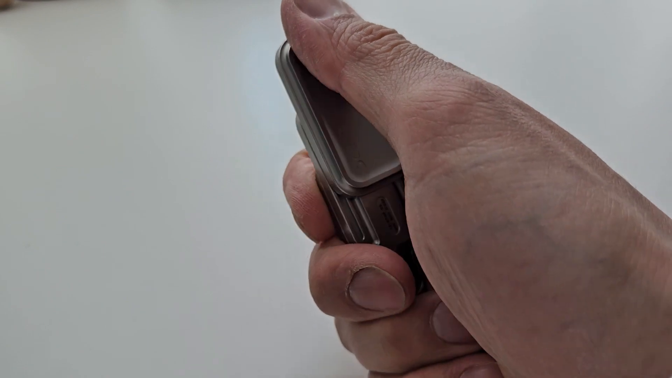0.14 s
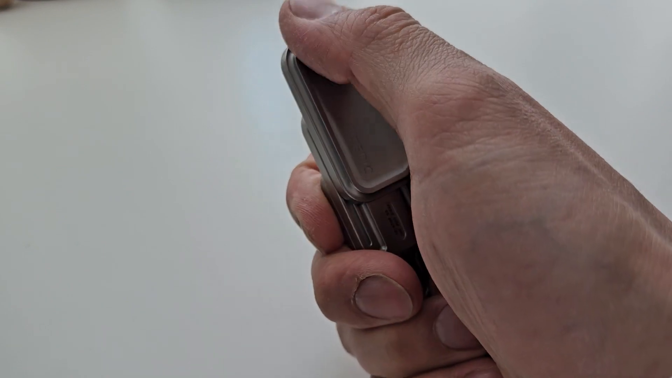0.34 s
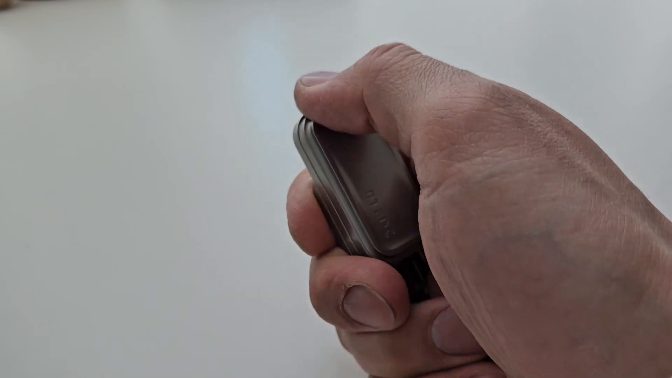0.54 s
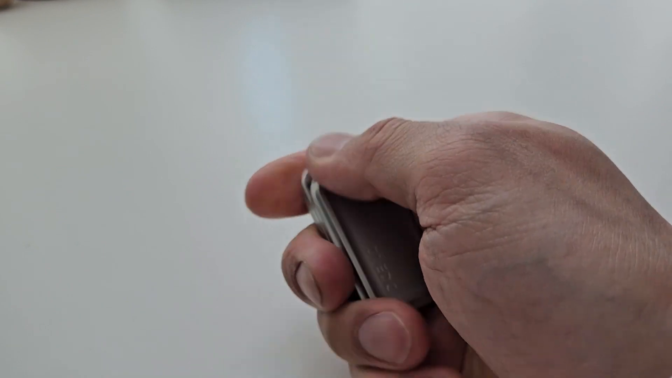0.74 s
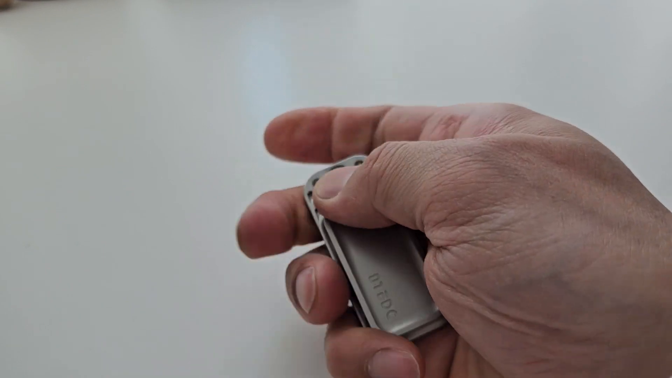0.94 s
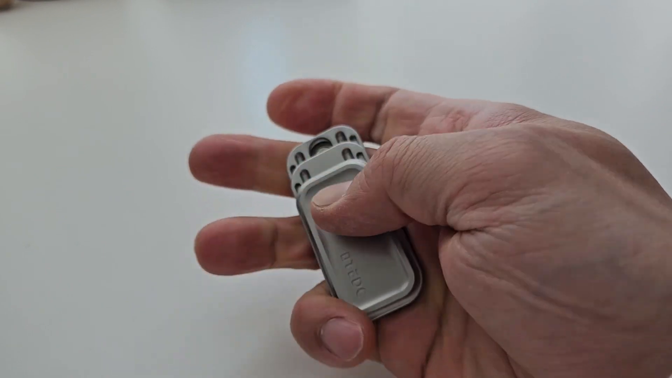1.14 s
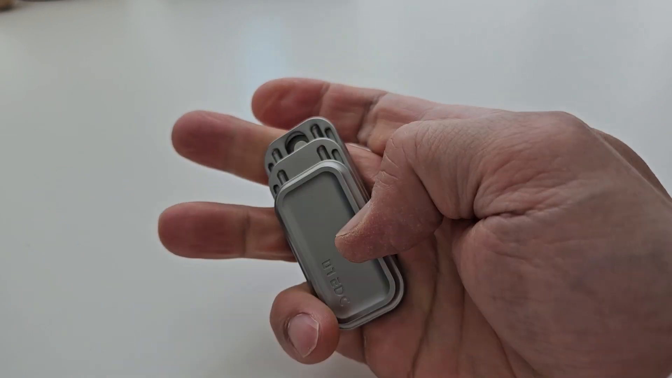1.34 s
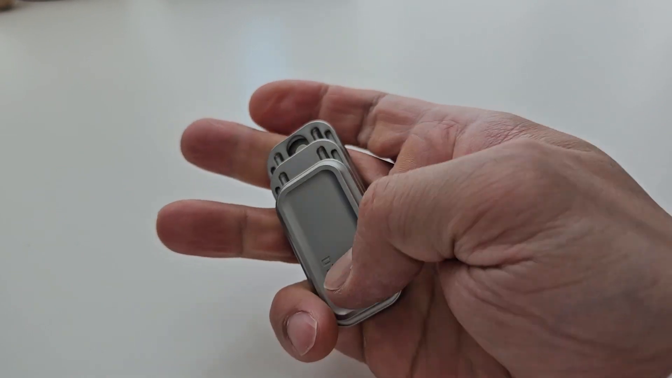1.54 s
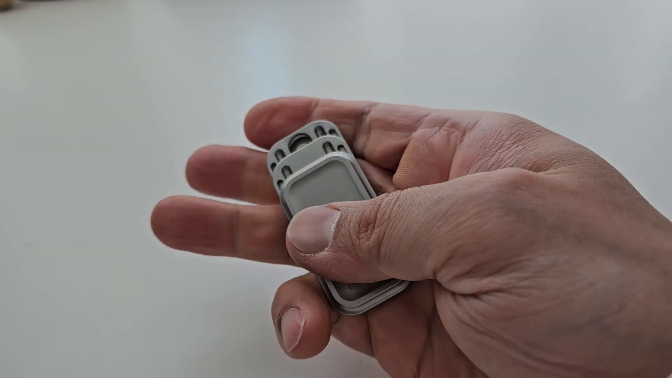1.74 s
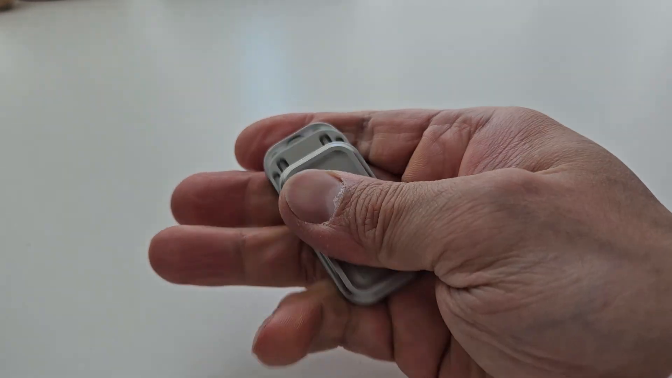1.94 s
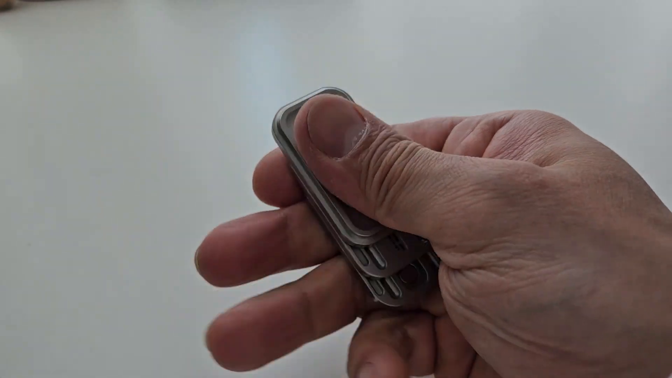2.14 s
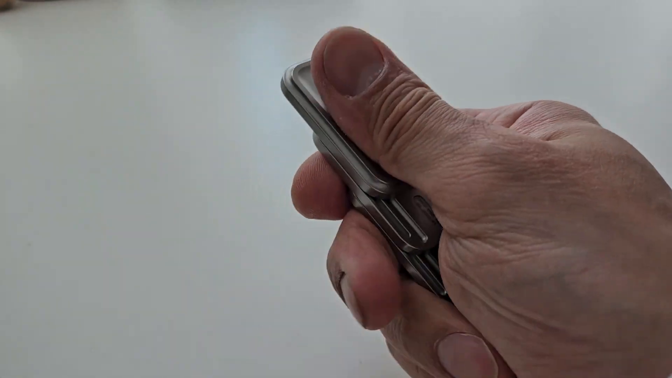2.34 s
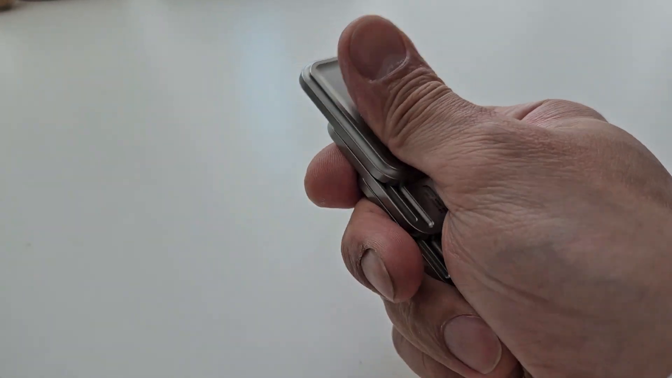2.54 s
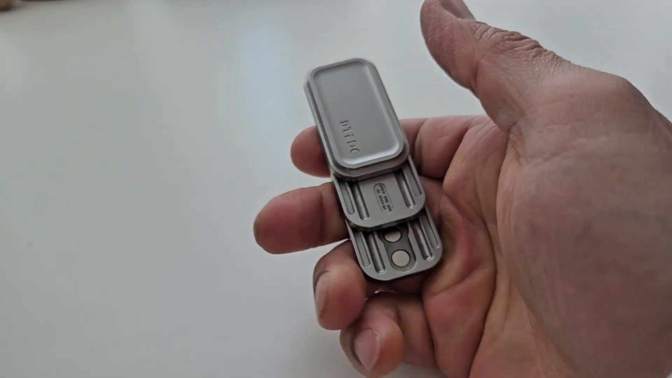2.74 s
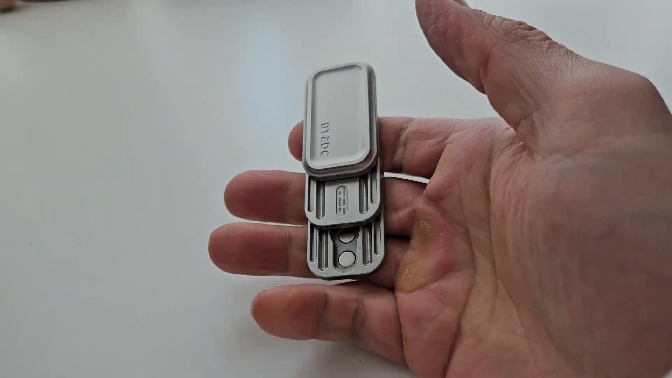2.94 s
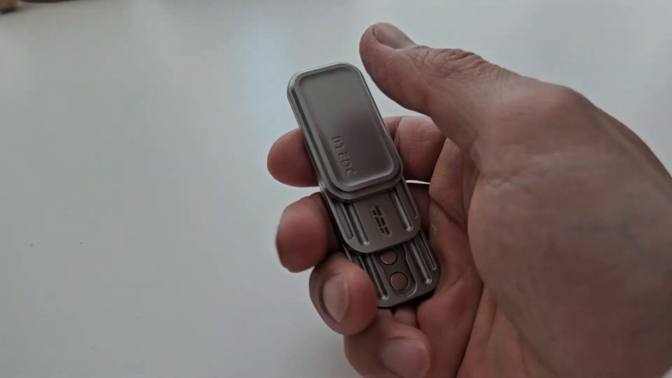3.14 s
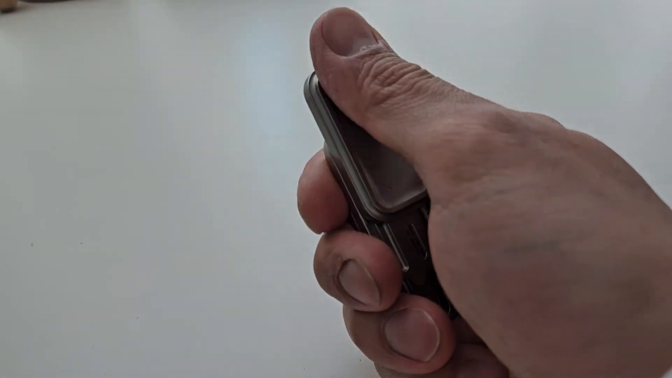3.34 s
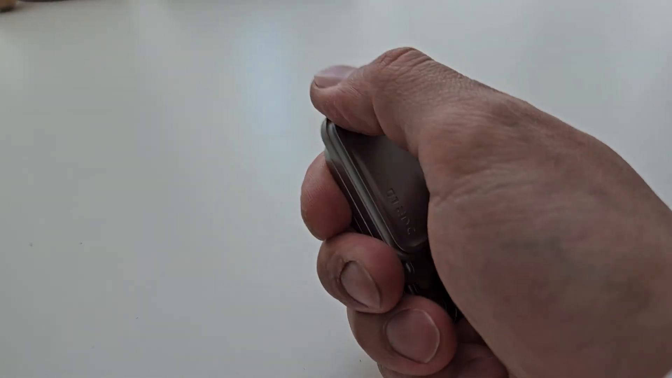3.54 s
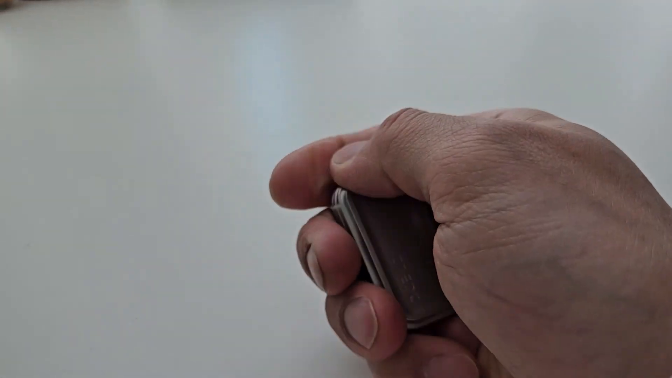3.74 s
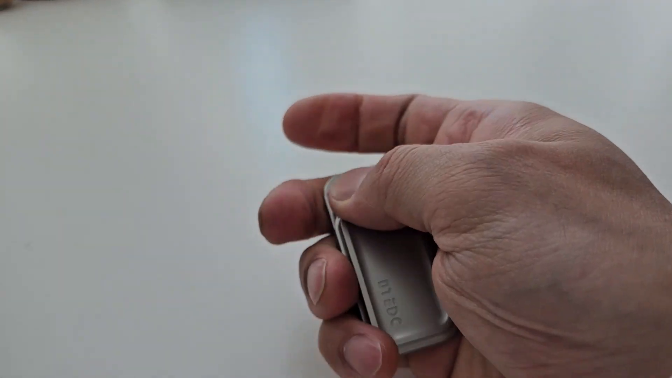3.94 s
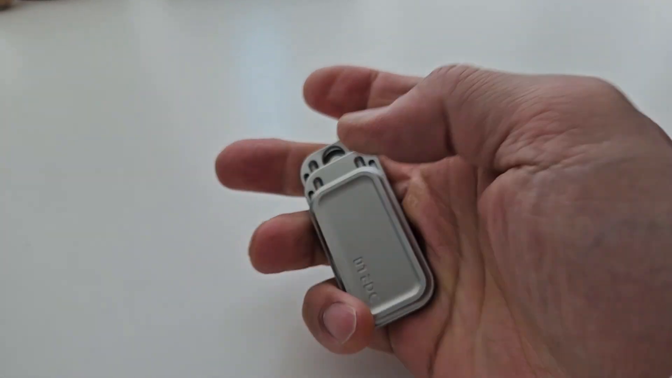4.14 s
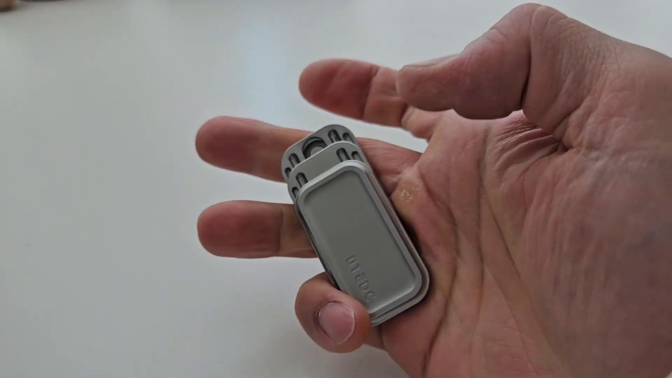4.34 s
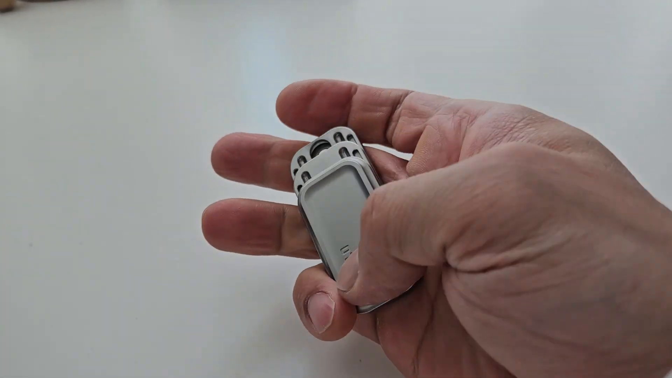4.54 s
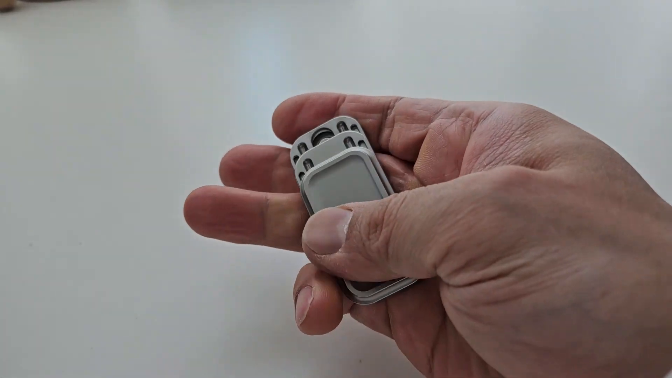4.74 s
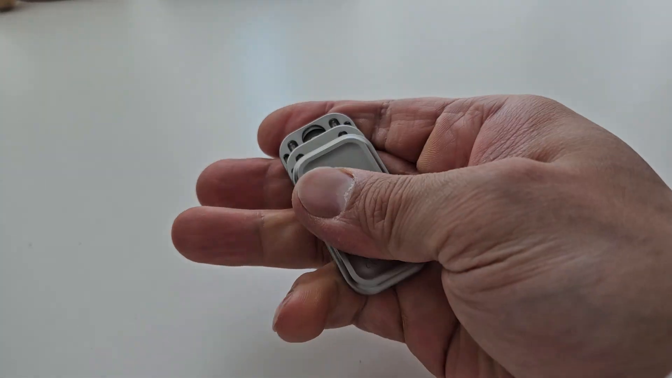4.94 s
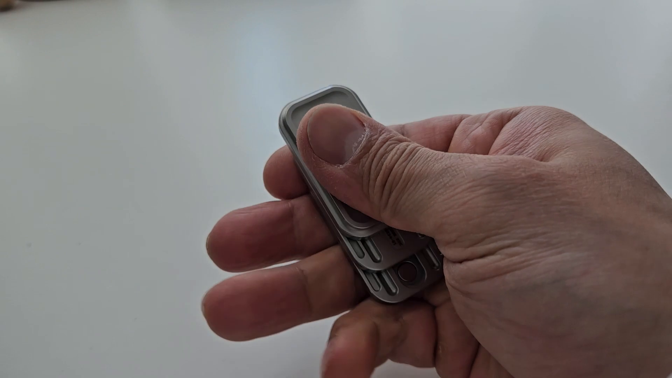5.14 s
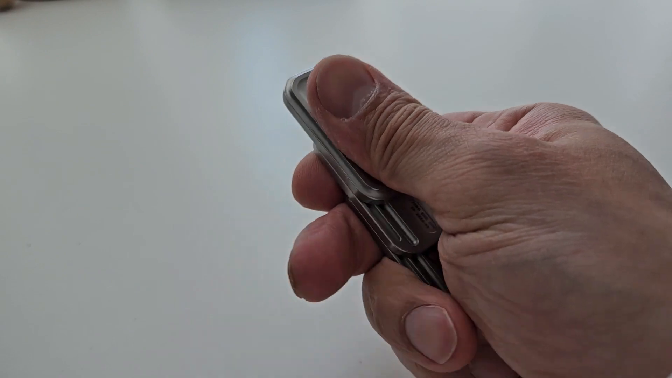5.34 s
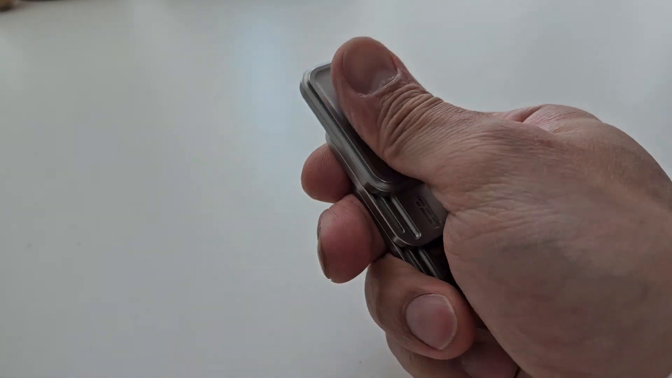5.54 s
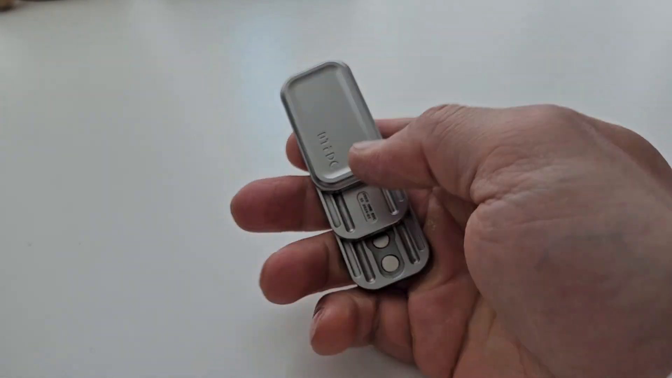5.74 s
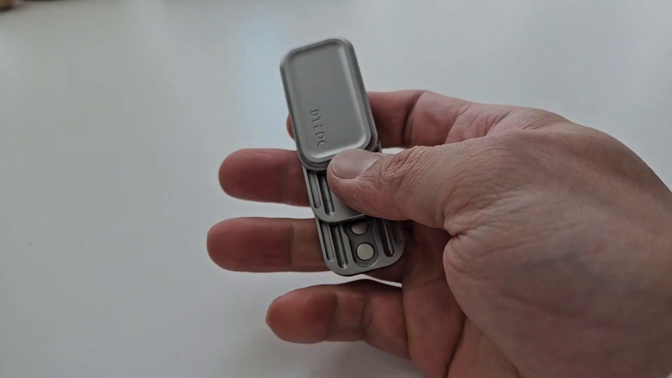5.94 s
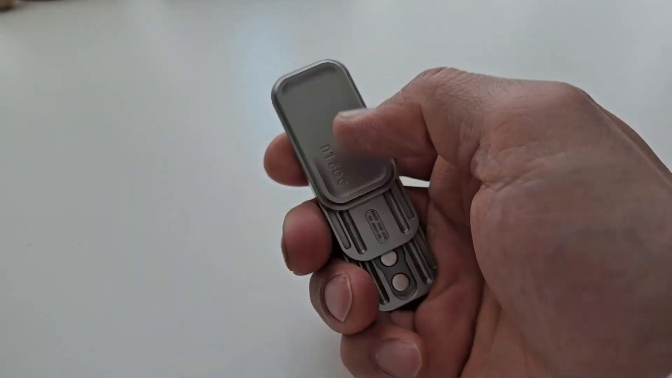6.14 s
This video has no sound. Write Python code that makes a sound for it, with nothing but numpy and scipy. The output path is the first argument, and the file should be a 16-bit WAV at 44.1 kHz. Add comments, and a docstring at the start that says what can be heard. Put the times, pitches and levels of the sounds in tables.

```python
"""A quiet room: close above a table, a metal magnetic slider is worked in one hand: shut, open, shut, open.
In each stroke the magnets catch a plate, it bumps over detents and slams into its end stop.
Each impact is a noise force that cracks and excites damped plate modes, which the fingers muffle.
The hand takes up each jolt with a soft thud; hard stops puff air at the left microphone port; low noise swells.
The room answers with decaying noise, over a faint rumble and hiss."""
import sys
import numpy as np
from scipy import signal
from scipy.fft import rfft, irfft
from scipy.io import wavfile
from scipy.ndimage import uniform_filter1d, minimum_filter1d

SR = 44100
rng = np.random.default_rng(int(sys.argv[2]) if len(sys.argv) > 2 else 0)


def generate_wav(sig):
    """Save sig (samples, or channels by samples) to the path in sys.argv[1] as 16-bit PCM at SR."""
    pcm = np.round(np.clip(np.atleast_2d(sig).T, -1, 1) * 32767).astype(np.int16)
    wavfile.write(sys.argv[1], SR, pcm)


N = 276948  # samples in the scene
EVENT_S = np.arange(-2646, 3969) / SR  # time axis of one event, its impact at zero

# Impacts of the plates: [t/s, kind, level/dB, brightness/(dB per octave), chatter decay/ms,
# f/Hz of the ping that the grip leaves free, ping level/dB re the impact]
SNAPS = [(0.4152, "catch", -20.5, 0.5, 3.7, 8850, -11.5), (0.4329, "catch", -21.5, 0, 2.3, 4740, -6),
         (0.504, "catch", -18.5, 1.5, 2.4, 3160, -5), (0.5201, "catch", -26.5, -2, 1.4, 6000, -7),
         (0.5723, "drag", -17, 0, 2.7, 9130, -11.5), (.6285, "drag", -27.5, -2, 2.9, 3040, -3),
         (0.7399, "shut", -13.5, 0, 8.7, 8640, -7.5), (0.8124, "shut", -16.5, 1, 2.2, 8640, -6),
         (1.0492, "step", -76.5, 5, 2.5, 4270, -21), (1.9384, "catch", -18, 4, 3, 8160, -1),
         (1.9477, "catch", -26.5, 5.5, 4.1, 9600, -10.5), (2.0076, "open", -17.5, -0.5, 1.4, 6570, -8),
         (2.0671, "step", -34, -1, 2, 4270, 1), (2.1239, "step", -30.5, 4, 5.3, 4270, 0.5),
         (2.1982, "skid", -16.5, 0.5, 5.3, 8640, -13.5), (2.2994, "open", -18.5, 2, 5.6, 5540, -13.5),
         (2.486, "open", -45, -2, 3.7, 4900, -10), (3.529, "catch", -16, 1, 1.2, 8430, -3.5),
         (3.5992, "catch", -19, -0.5, 2.6, 9130, -5.5), (3.652, "drag", -24, -1, 1.5, 4900, -4),
         (3.705, "drag", -27.5, -1, 3, 2850, -2.5), (3.8318, "shut", -14.5, 0, 4.4, 8430, -8),
         (3.8793, "shut", -15, 1.5, 2.7, 9130, -7), (4.0506, "step", -60, -5.5, 2.8, 4270, -5),
         (4.9418, "catch", -19.5, 3, 2.9, 8850, -10), (4.961, "step", -34.5, 2, 1.5, 4580, -13),
         (5.0491, "step", -34.5, 0.5, 8.3, 4580, -8), (5.1088, "step", -39, 1.5, 5.9, 4270, -6.5),
         (5.1831, "skid", -16, .5, 12.3, 8430, -11.5), (5.274, "open", -16, 2, 5.1, 4740, -11),
         (5.425, "open", -47.5, -1, 3.2, 5540, -4)]
# Kinds of impact: the magnets "catch"; closing, a plate "drag"s over dull detents and slams "shut";
# it "step"s over light detents while opening, or ticks faintly after a closing stroke;
# opening, it "skid"s along its rails and hits the "open" stop.
# kind: [scrape swell/ms, scrape level/dB re contact, contact softness/ms, muffled band level/dB,
# left minus right level/dB, room send level/dB, thud level/dB re the impact]
KINDS = {"catch": (7, -27, 1, -10, -1.5, 2, -27.5), "drag": (5.5, -15.5, 1.94, -10.5, -.5, 0.5, -30.5),
         "shut": (9.5, -20.5, 1.12, -2.5, 1.63, 4, -30), "step": (5, -26, 2.1, -6.5, -1, 4, -6),
         "skid": (6.5, -19, 1.1, -14.5, -3, 5.5, -37), "open": (5, -23.5, 1, -4.5, -4, 2.5, -26)}
# Tone of each kind before its brightness tilt; kind: [knock, clack, clink, ring, tick relative level/dB]
TONES = {"catch": (-28, -8, -4.5, -3.5, -14), "drag": (-31.5, -1, -7.5, -12, -26.5),
         "shut": (-22, -8.5, -8, -1.5, -12.5), "step": (-29, -10.5, -3, -7, -13.5),
         "skid": (-33.5, -18.5, -1.5, -8.5, -5.5), "open": (-25, -11.5, -7, -5, -6)}
# Registers of the metal, knock, clack, clink, ring and tick: [lower f/Hz, upper f/Hz]
REGISTERS = [(250, 1750), (2000, 3700), (3700, 7000), (7000, 10000), (10000, 16500)]
# Modes of the plates before the grip alters them: [f/Hz, undamped t60/s, relative level/dB]
PLATE_MODES = [(2250, .025, -19), (2850, .025, -5), (3040, .03, 1), (3160, .03, 3), (3390, .025, 2),
               (3900, .025, -10), (4270, .04, -5), (4580, .03, -1), (4740, .025, -1), (4900, .03, 0),
               (5100, .02, -2), (5540, .02, -2), (6000, .02, -6), (6570, .025, -2), (7400, .03, -6),
               (7740, .03, -4), (8160, .035, 2), (8430, .03, 2), (8640, .04, 2), (8850, .03, 2),
               (9130, .03, 0), (9600, .012, -12), (10180, .02, -7), (15700, .06, -7.5)]
# Colour of the bare metal contact: [f/Hz, relative level/dB]
CONTACT_COLOUR = [(200, -16), (600, -15), (1250, -10), (1700, -12), (2050, -13), (2450, -10), (3100, 2),
                  (4000, -2.5), (5100, 2.5), (6500, -1), (8600, 2), (9800, -2), (12500, -6), (16000, -9)]
# Band of the plates that the fingers damp most; kind: centre f/Hz
MUFFLED_HZ = {"catch": 7530, "drag": 7200, "shut": 6900, "step": 7200, "skid": 3700, "open": 3800}
# Rings that end stops throw sideways into the room; kind: list of
# [f/Hz, half-width relative to f, level/dB re the impact before the room gain]
BLOOMS = {"shut": [(4200, .015, -13.5)], "skid": [(4900, .06, -6.5)], "open": [(5400, 0.068, -5),
          (2228, 0.15, -14)]}
# Hearing of the slider at the two ports: [f/Hz, left minus right level/dB, left lead/rad]
PORTS = [(475, 4.5, 2.5), (1241, 4, -0.05), (2040, 0, 1.96), (3350, 8, 2.5), (4000, 2, 1.5),
         (5200, -1.5, 1.5), (6800, 3, -2.5), (7400, 5, 2.1), (7800, -1.5, -1), (9980, 1.5, 2.5),
         (10650, 7.5, 9.5), (16100, 9, 7)]
# Reverberation of the room: [f/Hz, t60/s, relative level/dB]
ROOM = [(300, .3, -10), (1177, 0.18, -2), (2230, 0.28, 0), (2740, 0.24, -7.5), (4300, 0.3, 0),
        (7000, 0.29, -1), (8730, 0.26, 0), (11380, 0.16, 5.5), (15500, 0.22, -3.5)]
# Air squeezed out between the plates: [t/s, f/Hz, half-length/ms, level/dB at the left port]
PUFFS = [(.739, 231, 3.9, -23), (.746, 580, 2.3, -28.5), (.816, 72.3, 4.9, -18), (.8135, 330, 1.5, -22),
         (2.01, 120, 3.9, -32), (2.3004, 270, 2.9, -36), (3.8291, 241, 5.3, -23.5), (3.837, 418, 5.06, -30),
         (5.184, 213.3, 9.6, -45)]
# Low noise swells, rubbing during the strokes and faint swells of the background rumble:
# [t/s, half-length/ms, f/Hz, level/dB]
LOW_SWELLS = [(.03, 50, 153, -64.5), (0.601, 120, 90, -55), (2.11, 83, 82, -50.5),
              (2.73, 19.6, 53.5, -58.5), (3.72, 140, 71.8, -54.5), (5.11, 97, 79.05, -54)]
# Spectrum of the background: [f/Hz, relative spectral level/dB per Hz]
FLOOR = [(12, -36.5), (20, -7.5), (60, 3.5), (74, -6.5), (86, -9.5), (172, -2.5), (193, -12.5), (234, -2.5),
         (310, -17.5), (472, -18), (513, -27.5), (1090, -34), (1760, -40.5), (5000, -46.5), (10500, -52.5),
         (13500, -50), (16000, -50.5)]

MUFFLED_SHARE = .2  # half-width of the muffled band, relative to its centre
FIRM_DB, TICK_DB_PER_DB = -16.5, 0.06  # impacts softer than a firm one lose top treble
BLOOM_T60_S = .055
THUD_LAG_S = .007  # the flesh gives way just after the blow
ROOM_DB, FLOOR_DB = -14.5, -67
TOP_HZ = 15950


def slider():
    """Superposition: all impacts sum into the direct sound and the sound radiated into the room."""
    direct, send = np.zeros((2, 2, N))
    for s, kind, level_db, bright_db, chatter_ms, ping_hz, ping_db in SNAPS:
        scrape_ms, scrape_db, contact_ms, muffle_db, pan_db, send_db, _ = KINDS[kind]
        contact = contacts(scrape_ms, scrape_db, contact_ms, chatter_ms)
        levels = registers(kind, level_db, bright_db)
        sound = snap(contact, MUFFLED_HZ[kind], muffle_db, ping_hz, level_db + ping_db, levels)
        pan = undb(np.array([[pan_db], [-pan_db]]) / 2)
        add(direct, s, sound * pan)
        add(send, s, sound * undb(send_db))
        for hz, width, db in BLOOMS.get(kind, []):
            add(send, s, bloom(hz, width, level_db + db))
    return direct, send


def contacts(scrape_ms, scrape_db, contact_ms, chatter_ms,
             gap_ms=2.5, scatter=0.27, uneven=0.58, hold_ms=0.94, rise=0.6, count=8):
    """Repeated impact: a scrape swells, the blow falls, and uneven rebounds weaken on average."""
    ms = EVENT_S * 1000
    gaps = gap_ms * np.exp(scatter * rng.standard_normal(count))
    times = np.cumsum(gaps) - gaps[0]
    sizes = np.exp(-times / chatter_ms + uneven * rng.standard_normal(count))
    since = ms - times[:, None]
    # a soft contact builds up slowly; each decays with the time constant hold_ms
    constants_ms = np.where(since < 0, rise * contact_ms, hold_ms)
    blows = sizes @ np.exp(-np.abs(since) / constants_ms)
    scrape = (ms < 0) * np.exp(-np.abs(ms) / scrape_ms) * (1 - ms / ms[0])
    return blows + undb(scrape_db) * scrape


def snap(contact, muffle_hz, muffle_db, ping_hz, ping_db, levels,
         ring_db=1, apart=0.62, grip_db=5.0, damping=.75):
    """Modal excitation: a rough contact force cracks and rings plate modes that the grip selects."""
    count = len(EVENT_S)
    # partly shared by the two channels
    grit = rng.standard_normal(count) + apart * rng.standard_normal((2, count))
    force = grit * contact
    t = EVENT_S[EVENT_S >= 0]
    hz, t60, db = np.transpose(PLATE_MODES)[:, :, None]
    detune, grip = rng.standard_normal((2, len(hz), 1))
    rings = np.sin(2 * np.pi * hz * (1 + .003 * detune) * t) * fade(t, t60 * damping)
    rung = signal.fftconvolve(force[None], rings[:, None], axes=-1)[..., :count]
    gains = undb(db + grip_db * grip)
    plates = sum(gain * unit(mode) for gain, mode in zip(gains, rung))
    crack = unit(colour(force, CONTACT_COLOUR))
    sound = crack + undb(ring_db) * unit(plates)
    low_hz, high_hz = muffle_hz * (1 - MUFFLED_SHARE), muffle_hz * (1 + MUFFLED_SHARE)
    sound = colour(sound, [(low_hz, 0), (muffle_hz, muffle_db), (high_hz, 0)])
    # the mode nearest the ping's pitch escapes the fingers and stands out
    free = np.argmin(np.abs(hz - ping_hz))
    ping = band(rung[free], hz[free, 0] * .85, hz[free, 0] * 1.15)
    voiced = sum(burst(band(sound, lo, hi), level) for level, (lo, hi) in zip(levels, REGISTERS))
    return burst(ping, ping_db) + voiced


def registers(kind, level_db, bright_db):
    """Spectral balance: energy is shared among registers, tilted by brightness, duller when soft."""
    octaves = np.log2(np.mean(REGISTERS, axis=1))
    tone = np.array(TONES[kind]) + bright_db * octaves
    tone[-1] += TICK_DB_PER_DB * min(level_db - FIRM_DB, 0)
    return level_db + tone - 20 * np.log10(np.linalg.norm(undb(tone)))


def bloom(hz, width, level_db):
    """Directional radiation: a decaying narrow noise band is the ring an end stop throws to the room."""
    push = fade(EVENT_S, BLOOM_T60_S) * rng.standard_normal((2, len(EVENT_S)))
    return burst(band(push, hz * (1 - width), hz * (1 + width)), level_db)


def ports(x, size=2500):
    """Diffraction: so close, the phone's body shades and delays each port differently."""
    hz, *curves = np.transpose(PORTS)
    # both curves are smoothed over size spectral bins
    db, lead = (uniform_filter1d(on_axis(hz, curve, N), size) for curve in curves)
    half = undb(db / 2) * np.exp(1j * lead / 2)
    pair = np.array([half, 1 / half])
    mean_gain = np.sqrt(np.mean(np.abs(pair) ** 2, axis=0))
    return irfft(rfft(x) * pair / mean_gain, N)


def room(x, first_s=0.0074, early_db=4, early_t60=0.12, lumpy=0.19):
    """Reverberation: lumpy early reflections from table and walls melt into a tail, its t60 set per band."""
    t = np.arange(int(.7 * SR)) / SR
    hz, t60, db = np.transpose(ROOM)
    early = fade(t - first_s, early_t60)
    noise = rng.standard_normal((2, len(t)))
    noise = noise * np.exp(lumpy * early * rng.standard_normal((2, len(t))))
    spectrum = rfft(noise)
    tail = 0
    for share, life, level in zip(np.eye(len(hz)), t60, db):
        part = irfft(spectrum * on_axis(hz, share, len(t)), len(t))  # overlapping triangular bands
        tail = tail + undb(level) * fade(t - first_s, life) * part
    response = unit(tail * (1 + undb(early_db) * early))
    return undb(ROOM_DB) * signal.fftconvolve(x, response, axes=-1)[:, :N]


def thuds(thud_hz=78, swell_s=0.0098):
    """Impulse absorption: the hand takes up each jolt as a low damped tone, alike at both ports."""
    out = np.zeros((2, N))
    age = np.maximum(EVENT_S, 0) / swell_s
    for s, kind, level_db, *_ in SNAPS:
        db = level_db + KINDS[kind][-1]
        hz = thud_hz * np.exp(0.12 * rng.standard_normal())
        tone = np.sin(2 * np.pi * hz * EVENT_S)
        add(out, s + THUD_LAG_S, undb(db) * age * np.exp(1 - age) * tone)
    return out


def puffs(right_db=-15, turbulence=0.4):
    """Air displacement: a pulsed tone with turbulent noise strikes mostly the left port."""
    out = np.zeros((2, N))
    for s, hz, ms, db in PUFFS:
        eddies = band(rng.standard_normal(len(EVENT_S)), hz / 2, hz * 3)
        gust = np.sin(2 * np.pi * hz * EVENT_S) + turbulence * eddies / eddies.std()
        add(out, s, undb([[db], [db + right_db]]) * swell(ms) * gust)
    return out


def low_swells():
    """Amplitude modulation: low noise bands swell and fade, as rubbing or rumble, alike at both ports."""
    out = np.zeros((2, N))
    for s, ms, hz, db in LOW_SWELLS:
        noise = band(rng.standard_normal(N), hz * 0.48, hz * 1.8)
        away = (np.arange(N) / SR - s) * 1000 / ms
        out += undb(db) * np.exp(-away ** 2 / 2) * noise / noise.std()
    return out


def floor(alike_hz=560):
    """Coherence: quiet room rumble is mostly alike in both ports, under unrelated hiss."""
    mid, side = rng.standard_normal((2, N))
    side = colour(side, [(60, -13), (alike_hz / 2, -9), (alike_hz, -1), (1400, 0)])
    noise = colour(mid + side * np.array([[1], [-1]]), FLOOR)
    return undb(FLOOR_DB) * noise / noise.std()


def undb(db):
    """Level: decibels become an amplitude gain."""
    return 10 ** (np.asarray(db) / 20)


def on_axis(hz, values, count):
    """Interpolation: points are joined on a log-frequency axis for the spectrum of count samples."""
    return np.interp(np.log(np.fft.rfftfreq(count, 1 / SR) + 1), np.log(hz), values)


def colour(x, points):
    """Linear filtering: the spectrum of x is weighted by points of f/Hz, level/dB."""
    hz, db = np.transpose(points)
    return irfft(rfft(x) * undb(on_axis(hz, db, x.shape[-1])), x.shape[-1])


def band(x, lo, hi):
    """Band limitation: a steep causal filter passes lo to hi/Hz."""
    return signal.sosfilt(signal.butter(4, [lo, hi], "band", fs=SR, output="sos"), x)


def unit(x):
    """Normalisation: the mean energy per channel becomes one."""
    return x / np.sqrt(np.mean(np.sum(x ** 2, axis=-1)))


def burst(x, db):
    """Equal energy: a short sound gets the energy of 20 ms at an rms level of db."""
    return undb(db) * np.sqrt(.02 * SR) * unit(x)


def fade(t, t60):
    """Exponential decay: amplitude falls by 60 dB in t60/s from time zero."""
    return (t >= 0) * np.exp(-np.log(1000) * np.abs(t) / t60)


def swell(ms):
    """Pulse envelope: a smooth rise and fall around time zero."""
    return 1 / np.cosh(np.pi / 2 * EVENT_S * 1000 / ms)


def add(out, s, x):
    """Superposition: an event on the axis EVENT_S is mixed in with its zero at s."""
    i = int((s + EVENT_S[0]) * SR)
    out[:, i:i + x.shape[-1]] += x[..., :N - i]


def scene():
    """Superposition: the slider, its room, the hand's thuds, air, low swells and background add together."""
    direct, send = slider()
    near = ports(direct) + thuds() + puffs()
    return near + room(send) + low_swells() + floor()


def record(dry, size=45):
    """Limiting: the phone's fast gain control holds peaks to 0.97, then a low-pass cuts the top."""
    needed = np.minimum(1, .97 / np.abs(dry).max(axis=0))
    gain = uniform_filter1d(minimum_filter1d(needed, size), size)
    low_pass = signal.ellip(8, .2, 70, TOP_HZ, fs=SR, output="sos")
    return signal.sosfilt(low_pass, dry * gain)


dry = scene()
out = record(dry)
generate_wav(out)
```